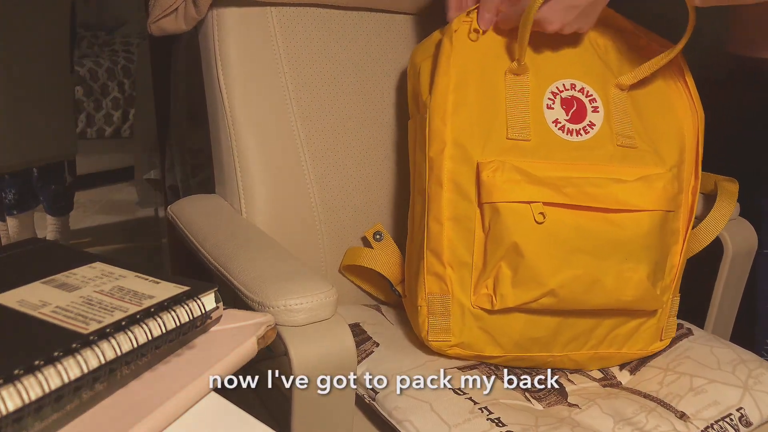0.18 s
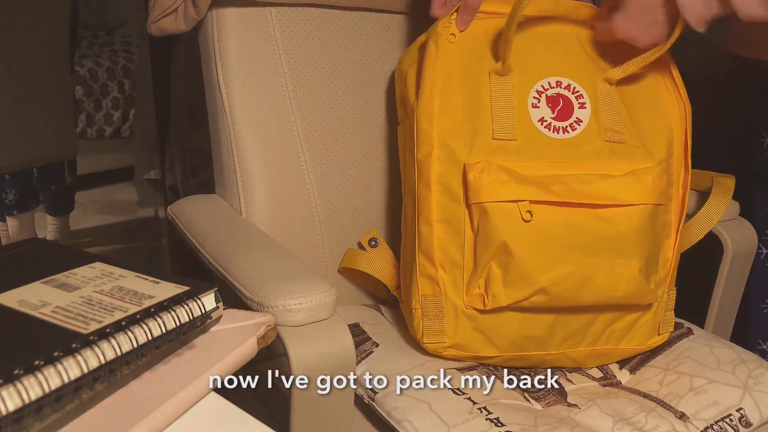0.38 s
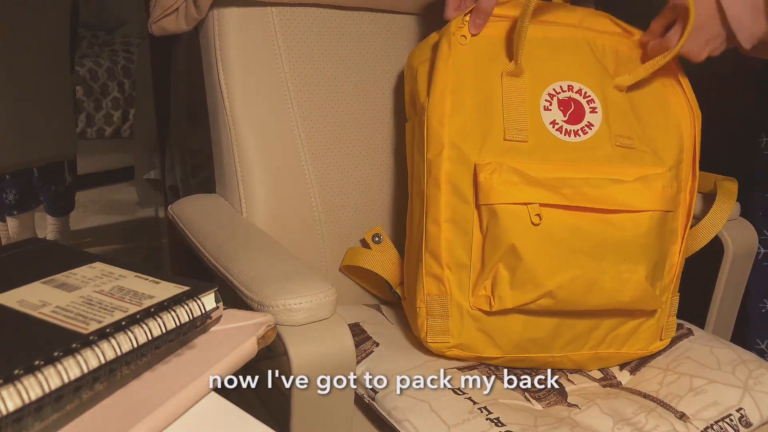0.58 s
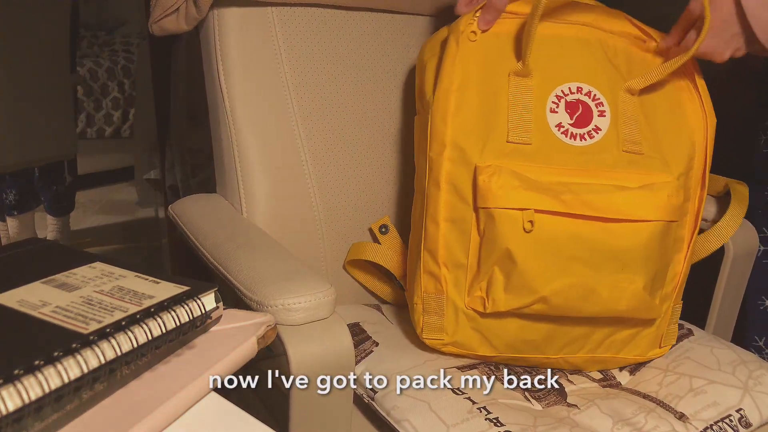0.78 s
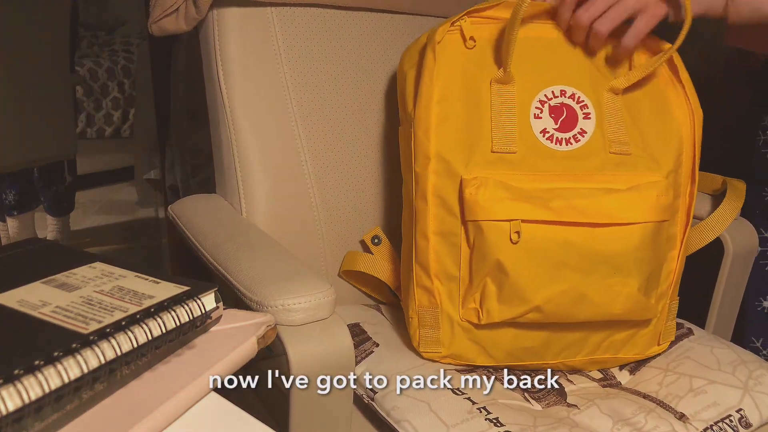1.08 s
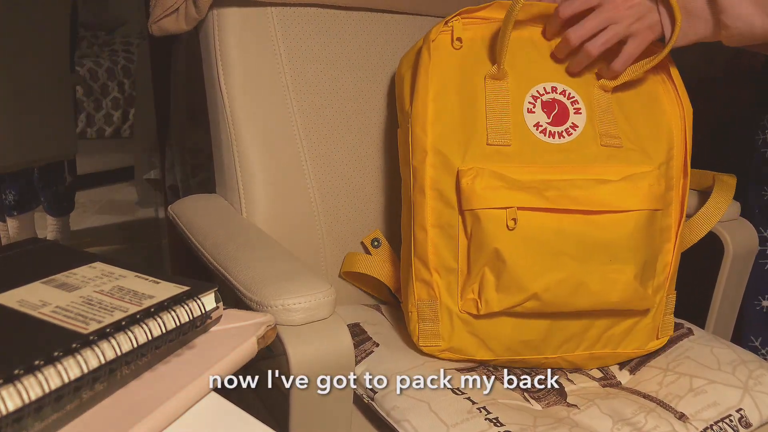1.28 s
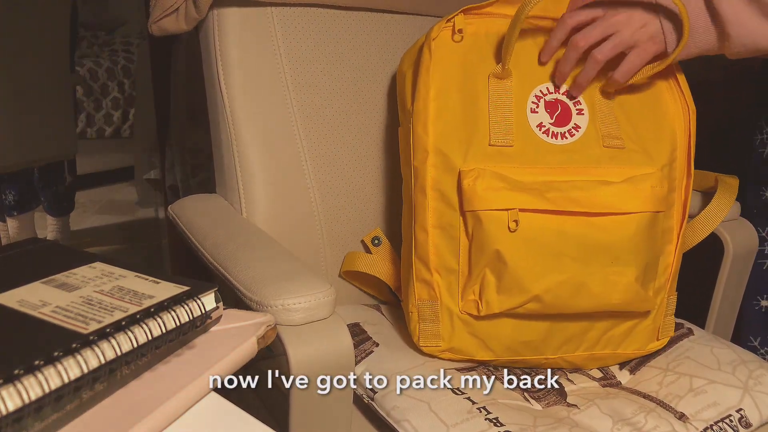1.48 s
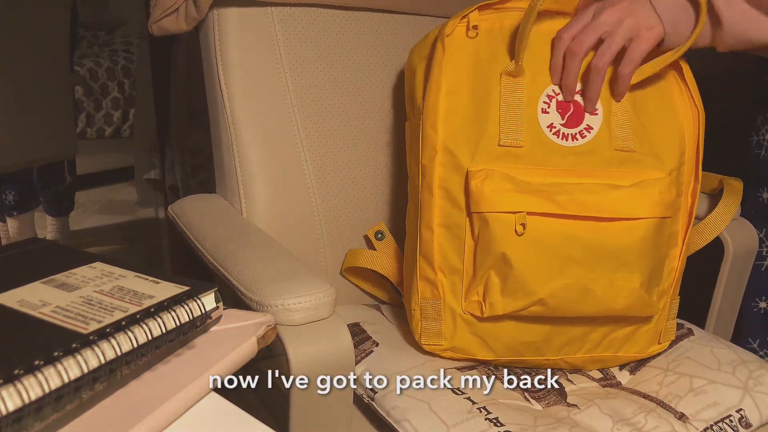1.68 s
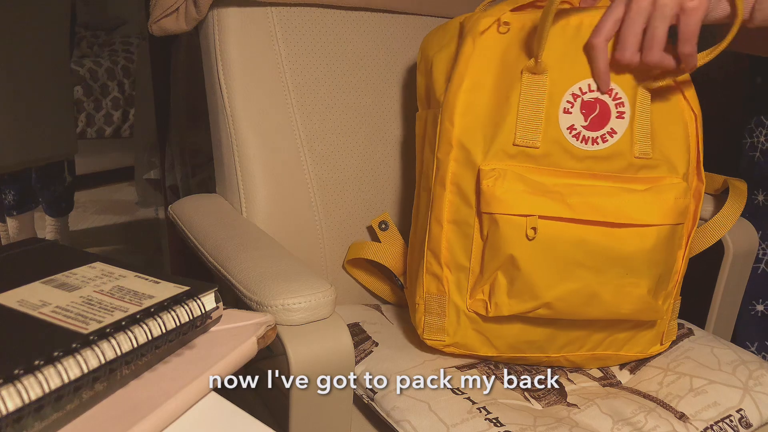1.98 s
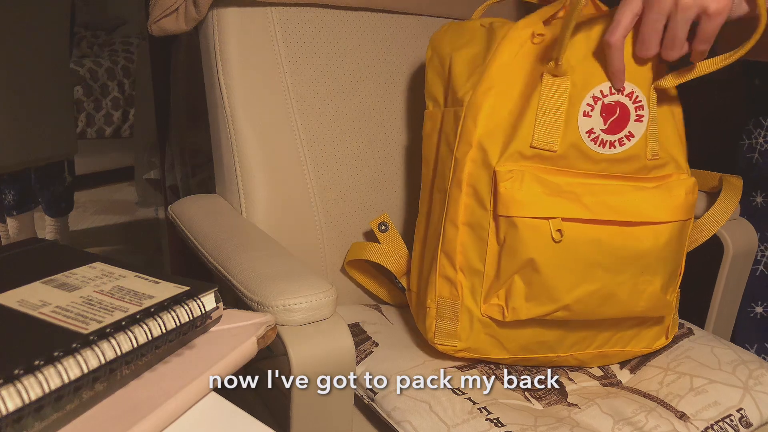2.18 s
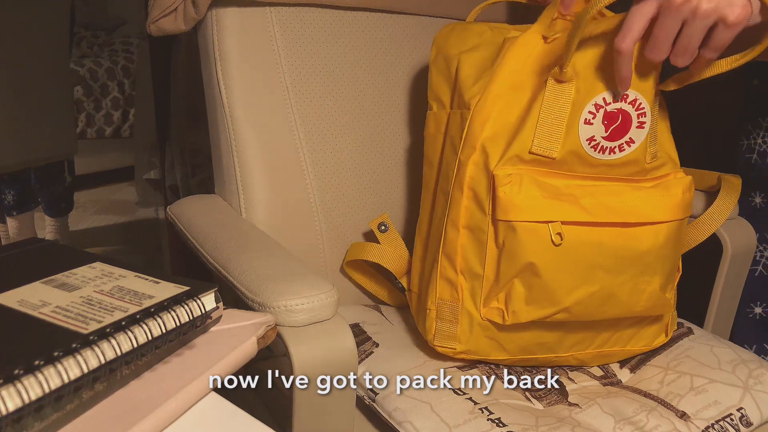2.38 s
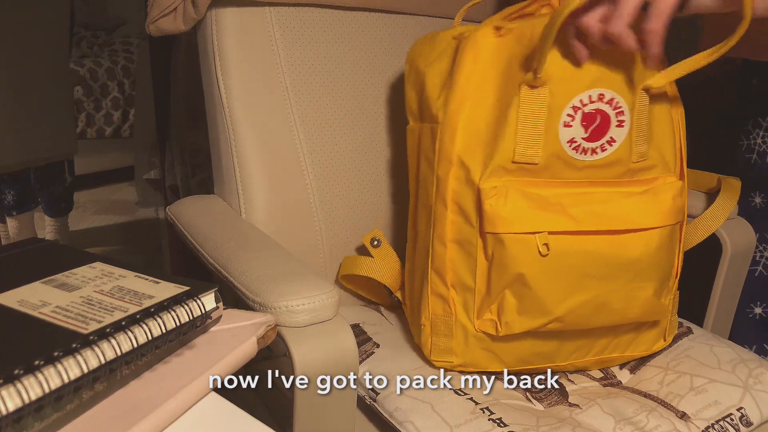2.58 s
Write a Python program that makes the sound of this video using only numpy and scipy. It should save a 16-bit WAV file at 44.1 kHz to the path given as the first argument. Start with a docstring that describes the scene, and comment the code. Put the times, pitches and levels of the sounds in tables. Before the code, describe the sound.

One short zip rasps up and down in pitch, followed by a hand rubbing and crumpling stiff canvas

```python
"""A small quiet room, with a canvas backpack on a padded chair, heard from close by.
One quick pull of the zipper, a row of tooth snaps, buzzes up and down in pitch.
Then a hand slides over the cloth and grips the top: filtered noise swishes, scuffs and scrapes.
Stiff folds buckle in small grains and pop as falling tones, fingernails and fittings tick as short
noise bursts, and the metal pull tabs clink as ringing tones shaken by a rattle."""
import sys
import numpy as np
from scipy import signal
from scipy.fft import rfft, irfft
from scipy.io import wavfile
from scipy.ndimage import uniform_filter1d

SR = 44100
rng = np.random.default_rng(int(sys.argv[2]) if len(sys.argv) > 2 else 0)


def store_pcm(level_fs):
    """Save levels as 16-bit WAV."""
    pcm = np.round(np.clip(level_fs, -1, 1) * 32767).astype(np.int16)
    wavfile.write(sys.argv[1], SR, np.atleast_2d(pcm).T)


N = 119070  # length of the scene [samples]
TIME = np.arange(N) / SR  # [s]


def amp(db):
    """Turns decibels into a plain gain."""
    return 10 ** (np.asarray(db) / 20)


def unit(x):
    """Scales a sound to an rms of 1."""
    return x / np.sqrt(np.mean(x ** 2) + 1e-20)


def read(points, hz):
    """Reads a frequency table between its points, on a log-frequency axis."""
    f, value = np.transpose(points)
    return np.interp(np.log(hz + 1), np.log(f), value)


def curve(table, axis=1):
    """Draws one column of a time table as a value for every sample."""
    rows = np.array(table)
    return np.interp(TIME, rows[:, 0], rows[:, axis])


def add(mix, s, sound):
    """Mixes a sound in, starting at s seconds."""
    start = max(round(s * SR), 0)
    part = mix[start:][:len(sound)]
    part += sound[:len(part)]


def colour(x, points, size=4096):
    """Filters with the given spectrum; the filter looks only backwards in time and has unit energy."""
    hz = abs(np.fft.fftfreq(size, 1 / SR))
    log_gain = np.log(amp(read(points, hz)))
    minimum_phase = np.exp(np.conj(signal.hilbert(log_gain)))
    ring = np.fft.ifft(minimum_phase).real[:size // 2]
    return signal.fftconvolve(x, ring / np.linalg.norm(ring))[:len(x)]


def wander(hz):
    """Makes a slow random curve of rms 1 that holds little above hz."""
    noise = rfft(rng.standard_normal(N))
    smoothing = 1 + (np.fft.rfftfreq(N, 1 / SR) / hz) ** 4
    return unit(irfft(noise / smoothing, N))


def steady(x, size=1800):
    """Evens out the slow level and keeps the fine grain; size is in samples."""
    power = uniform_filter1d(uniform_filter1d(x ** 2, size), size)
    return x / np.sqrt(abs(power) + 1e-9)


def grains(per_s, spread_db, smooth):
    """Random tiny slips of uneven size, over a share of smooth noise."""
    sizes = amp(spread_db * np.minimum(rng.exponential(1, N), 4))
    signs = rng.choice([-1, 1], N)
    happens = rng.random(N) < per_s / SR
    return unit(sizes * signs * happens) + smooth * rng.standard_normal(N)


def bend(x, delay_s):
    """Waves in a cloth panel: the treble outruns the bass (delay_s is the delay at 1 kHz)."""
    f = np.fft.rfftfreq(2 * N, 1 / SR)
    lag = np.exp(-4j * np.pi * delay_s * np.sqrt(1000 * f))
    return irfft(rfft(x, 2 * N) * lag)[:N]


def resonate(x, hz, width):
    """A resonance of gain 1 whose pitch may move; hz holds one value per sample."""
    turn = np.exp(2j * np.pi * np.cumsum(hz) / SR)
    r = np.exp(-np.pi * width / SR)
    # shift the pitch down to zero, smooth, and shift it back up
    return 2 * (turn * signal.lfilter([1 - r], [1, -r], x / turn)).real


def tick(db, hz, decay, size=2048):
    """A short hard contact: a broad noise burst around its own centre pitch."""
    width_octaves = 0.62
    t = np.arange(size) / SR
    f = np.fft.rfftfreq(size, 1 / SR)[1:]
    band = -10 * np.log10(1 + (np.log2(f / hz) / width_octaves) ** 4)
    burst = colour(rng.standard_normal(size) * np.exp(-t / decay), np.c_[f, band])
    return amp(db) * burst / abs(burst).max()


# Colour of the quiet background: (frequency [Hz], relative level [dB])
BACKGROUND_COLOUR = [(25, -66), (50, 15.5), (300, 7), (1500, 3), (4000, -12), (9000, -31), (16000, -7)]


def background():
    """A faint steady noise lies under everything."""
    level_db = -66.5
    return amp(level_db) * colour(rng.standard_normal(N), BACKGROUND_COLOUR)


# How long the room takes to fade by 60 dB: (frequency [Hz], time [s])
ROOM_FADE = [(100, 0.18), (300, 0.44), (1500, 0.15), (6000, 0.16)]


def room(x):
    """Scattered reflections make a short noisy tail, which fades at its own speed at each pitch."""
    gap_s = 0.0031  # the tail swells in over this time
    hz, t, z = signal.stft(rng.standard_normal(SR // 2), SR, nperseg=256)
    fade = amp(-60 * t / read(ROOM_FADE, hz)[:, None])
    tail = signal.istft(z * fade, SR, nperseg=256)[1]
    tail = tail * np.minimum(np.arange(len(tail)) / SR / gap_s, 1) ** 2
    return signal.fftconvolve(x, tail / np.linalg.norm(tail))[:N]


# Resonances of the hollow bag, rung by everything that touches it: (frequency [Hz], gain [dB])
HOLLOW_MODES = [(131, -6), (226, -6), (274, -18), (306, -17), (546, -12)]


def hollow(x):
    """The bag's cavity and panels hum on briefly after each touch."""
    width_hz = 12
    return sum(amp(db) * resonate(x, np.full(N, hz), width_hz) for hz, db in HOLLOW_MODES)


# Ticks of nails and fittings: (time [s], peak level [dB], centre frequency [Hz], decay [s])
TICK_EVENTS = [(0.164, -47.5, 2680, 0.00067), (0.198, -43.5, 1500, 0.0003), (0.2118, -38.5, 1820, 0.00028),
               (0.366, -31, 3030, 0.00089), (0.4925, -34, 2510, 0.00073), (0.6, -30, 1860, 0.00027),
               (0.8609, -30, 10300, 0.0034), (1.0056, -28, 2230, 0.0005), (1.0055, -29, 10000, 0.0026),
               (1.011, -22.5, 9900, 0.0016), (1.031, -44, 4400, .001), (1.099, -40, 2800, .001),
               (1.163, -43, 4000, 0.001), (1.436, -29, 8600, 0.0044), (1.842, -45, 900, 0.0023),
               (1.967, -32.5, 6000, 0.0042), (1.995, -33.5, 5940, 0.0012), (2.049, -23, 3050, 0.0004),
               (2.2285, -33, 1860, 0.00081), (2.285, -40, 2000, 0.0013), (2.358, -29.5, 4400, 0.00085)]


def ticks():
    """Nails and fittings knock on the bag, each with a short noise burst."""
    out = np.zeros(N)
    for s, db, hz, decay in TICK_EVENTS:
        add(out, s, tick(db, hz, decay))
    return out


# Pull tabs clinking: (time [s], peak level [dB])
CLINK_EVENTS = [(0.96, -35), (1.435, -49), (1.704, -51), (1.93, -40), (1.9695, -41), (1.998, -43),
                (2.016, -35.5), (2.0512, -36), (2.357, -40), (2.385, -37), (2.646, -43.5)]
# Ring of a metal tab: (frequency [Hz], typical relative level [dB], time to fade by 60 dB [s])
TAB_MODES = [(5694, -2.5, 0.11), (7710, -9, 0.11), (8610, -11.5, 0.075), (12940, 3.5, 0.059)]


def clinks():
    """A metal tab chatters against its slider, which keeps its ring grainy."""
    spread_db, detune_share = 5.5, 0.0022  # how much the ring varies from clink to clink
    rattle_s, rattle_share = 0.0092, 0.38  # decay of the chatter, share of bare contact noise
    out = np.zeros(N)
    t = np.arange(SR // 4) / SR
    hz, mode_db, t60 = np.array(TAB_MODES).T[:, :, None]
    for s, db in CLINK_EVENTS:
        strength, detune = rng.standard_normal((2, len(TAB_MODES), 1))
        mode_level = amp(mode_db + spread_db * strength - 60 * t / t60)
        modes = mode_level * np.sin(2 * np.pi * hz * (1 + detune_share * detune) * t)
        # cubed noise has rare strong peaks, like single contacts
        contacts = rng.standard_normal(len(t)) ** 3 * np.exp(-t / rattle_s)
        rattle = np.diff(contacts, prepend=0)
        ring = unit(signal.fftconvolve(rattle, modes.sum(0))[:len(t)])
        clink = ring + rattle_share * unit(rattle)
        add(out, s, amp(db) * clink / abs(clink).max())
    return out


# The bag flexing: (time [s], level [dB]); crackle() follows it too
FLEX_LEVEL = [(0, -93), (0.16, -63.5), (0.45, -48), (0.68, -59), (1.0, -53.5), (1.08, -57), (1.21, -51.5),
              (1.3, -64.5), (1.46, -52), (1.54, -64.5), (1.66, -60.5), (1.71, -58), (1.92, -56.5),
              (2.02, -40.5), (2.11, -44), (2.22, -37), (2.33, -50), (2.4, -46), (2.5, -63.5), (2.7, -61.5)]
# Colour of the creasing cloth: (frequency [Hz], relative level [dB])
CRUMPLE_COLOUR = [(25, -74), (48, -10.5), (105, -3.5), (140, -2), (310, 3.5), (420, -12), (550, -3.5),
                  (1100, -17), (12000, -55)]


def flexing():
    """Many small creases give way and thud in the hollow bag."""
    creases = colour(grains(230, 2.07, 0.17), CRUMPLE_COLOUR)
    return steady(bend(creases, 0.000672), size=1400) * amp(curve(FLEX_LEVEL))


def crackle(count=340):
    """Stiff canvas gives way in small dry snaps, louder the harder the bag is flexed."""
    hardest_db, follow = -38.5, 1  # typical peak at the hardest flexing, and dB per dB of flexing
    spread_db, typical_hz, decay_s = 2.5, 2280, 0.00041
    out, flex = np.zeros(N), curve(FLEX_LEVEL)
    # one snap at a random moment in each equal slice of time
    places = (np.arange(count) + rng.random(count)) * N / count
    for at in places.astype(int):
        strength, pitch = rng.standard_normal(2)
        db = hardest_db + follow * (flex[at] - flex.max()) + spread_db * strength
        add(out, at / SR, tick(db, typical_hz * 2 ** (pitch / 2), decay_s))
    return out


# Hand sliding on canvas: (time [s], swish level [dB], scuff level before a 2.5 dB cut [dB]),
# both before the stutter
RUB_LEVELS = [(0, -64.5, -67), (0.08, -70.5, -78), (0.58, -69, -63.5), (0.81, -61.5, -55),
              (0.94, -47.5, -52), (1.08, -56.5, -59), (1.125, -59, -49.5), (1.21, -57, -51),
              (1.29, -56, -57), (1.43, -54.5, -45), (1.505, -59, -75), (1.545, -72.5, -68),
              (1.63, -66.5, -64), (1.665, -58, -53), (1.85, -62.5, -91), (1.875, -52.5, -55),
              (1.91, -55.5, -64.5), (2.21, -56, -43), (2.335, -62.5, -76), (2.363, -43.5, -38),
              (2.41, -60.5, -55), (2.5, -64.5, -64), (2.555, -59, -54.5), (2.615, -65.5, -62),
              (2.67, -55, -61)]
# Bright colour of the cloth: (frequency [Hz], relative level [dB])
SWISH_COLOUR = [(300, 2.5), (4300, 5), (6500, 0), (15500, -6.5)]
# Dull colour of the cloth, also used by pops(): (frequency [Hz], relative level [dB])
SCUFF_COLOUR = [(40, -13.5), (180, -6.5), (280, 6.5), (420, -1), (1100, -2.5), (1700, -5), (2600, -17),
                (8000, -40)]


def rubbing():
    """Skin catches on the weave: a bright swish and a duller scuff that stutter together."""
    stutter_db = 2 * wander(62)
    swish = steady(colour(grains(1600, 3.74, 1.0), SWISH_COLOUR))
    scuff = steady(colour(grains(1200, 3.4, 1.0), SCUFF_COLOUR))
    swish = swish * amp(curve(RUB_LEVELS) + stutter_db)
    scuff = scuff * amp(curve(RUB_LEVELS, axis=2) + stutter_db - 2.5)
    return swish + scuff


# Fingertips dragging over the taut panel: (time [s], resonance [Hz], level [dB])
SCRAPE_PATH = [(1.07, 650, -87), (1.12, 710, -59), (1.36, 870, -52), (1.405, 1030, -59), (1.43, 1400, -48),
               (1.46, 704, -48), (1.51, 730, -50.5), (1.54, 710, -80)]


def scraping():
    """A hollow scrape: noise through a resonance whose pitch follows the fingers across the panel."""
    width_hz = 320  # of each of the two passes
    hz = curve(SCRAPE_PATH)
    once = resonate(rng.standard_normal(N), hz, width_hz)
    ring = resonate(once, hz, width_hz)
    touching = (TIME > SCRAPE_PATH[0][0]) * (TIME < SCRAPE_PATH[-1][0])
    return steady(ring) * amp(curve(SCRAPE_PATH, axis=2)) * touching


# Folds popping through: (time [s], level before a 5.5 dB cut [dB], final pitch [Hz], decay [s])
POP_EVENTS = [(0.6, -33.5, 249.2, 0.011), (0.816, -46, 293, 0.0075), (0.8872, -34.5, 607, 0.011),
              (0.951, -25.5, 225, 0.0088), (0.994, -32.5, 242.3, 0.022), (1.1, -37, 448, 0.01),
              (1.198, -33.5, 503, 0.0088), (1.214, -35, 482, 0.0043), (1.583, -45, 418, 0.0034),
              (1.686, -42.5, 283, 0.034), (1.87, -37.5, 234, 0.015), (1.925, -28.5, 199, 0.011),
              (1.962, -28.5, 290, 0.013), (1.986, -30.5, 333, 0.0045), (2.011, -31.5, 272, 0.023),
              (2.06, -27, 303, 0.004), (2.125, -36.5, 559.5, 0.054), (2.226, -30.5, 272, 0.02),
              (2.286, -33.5, 503, 0.02), (2.304, -32, 308, 0.0074), (2.553, -38.5, 614, 0.0078),
              (2.65, -43.5, 487, 0.0093)]


def pops():
    """A fold snaps through: the pitch drops at once as the panel goes slack."""
    sweep_hz, sweep_s = 981, 0.00262  # height and decay time of the pitch drop
    rise_s, grit_share = 0.0013, 0.38
    out = np.zeros(N)
    t = np.arange(SR // 10) / SR
    for s, db, hz, decay in POP_EVENTS:
        turns = np.cumsum(hz + sweep_hz * np.exp(-t / sweep_s)) / SR
        grit = unit(colour(rng.standard_normal(len(t)), SCUFF_COLOUR))
        shape = (1 - np.exp(-t / rise_s)) * np.exp(-t / decay)
        snap = np.sin(2 * np.pi * turns) + grit_share * grit
        add(out, s, amp(db - 5.5) * shape / shape.max() * snap)
    return out


# The zipper pull: (time [s], speed [teeth per s], rasp level [dB], drumming level [dB]);
# the rasp level also steers the hiss
ZIP_PULL = [(0.2, 115, -66, -49.5), (0.22, 161, -53, -44.5), (0.258, 312, -42, -39), (0.284, 447, -37, -55),
            (0.301, 460, -38.5, -40.5), (0.322, 507, -34.5, -44.5), (0.369, 577, -37, -71),
            (0.391, 476, -38, -60), (0.411, 505, -37.5, -40), (0.432, 365, -38, -35.5),
            (0.45, 275, -43, -33), (0.478, 206, -48.5, -41.5), (0.503, 133, -54, -39),
            (0.535, 118, -59, -48)]
# Unevenness of the teeth: (time [s], timing scatter [share of one tooth])
TOOTH_SCATTER = [(0.25, .14), (0.28, .03), (0.3, .02), (0.313, .09), (0.326, .025), (0.36, .016),
                 (0.374, .12), (0.392, .035), (0.44, .07)]
# Colours of the rasp, the drumming and the hiss, each: (frequency [Hz], relative level [dB])
RASP_COLOUR = [(100, -24), (300, -11), (510, 3), (750, -2), (1050, 4.5), (1550, 5), (2100, 0), (2800, -7),
               (3700, -7.5), (7000, -24)]
DRUM_COLOUR = [(40, -18), (150, -17), (210, -4), (285, 4), (390, -8), (540, -5), (780, -14.5), (1500, -36),
               (5000, -68)]
HISS_COLOUR = [(1200, -18), (4500, 1.5), (8000, 0.5), (15500, -5.5)]


def zipper(size_db=1.5, grit=0.068, hiss_floor=0.49, tooth_share=.4, fade_s=0.0036, delay_s=0.001547):
    """The slider snaps over each tooth: a rasp, a drumming of the bag and a puff of hiss."""
    hiss_db, hiss_growth_db = -13, 4.5  # top-speed level against the rasp, gain per doubling of speed
    echo_gain, echo_start_s, echo_s_per_tooth = 0.73, 0.00119, 0.00003
    rate = curve(ZIP_PULL)
    turns = np.cumsum(rate) / SR  # teeth passed so far
    at = np.flatnonzero(np.diff(np.floor(turns)))

    # one click per tooth, a little early or late and of uneven size
    slip, strength = rng.standard_normal((N, 2))[:len(at)].T
    scatter = slip * curve(TOOTH_SCATTER)[at] * SR / rate[at]
    place = np.clip(at + scatter, 0, N - 1).astype(int)
    teeth = np.zeros(N)
    teeth[place] = amp(size_db * strength) * np.sqrt(SR / rate[at])

    # noise that swells at each tooth
    puff_shape = unit(hiss_floor + np.exp(-(turns % 1) / tooth_share))
    puffs = puff_shape * rng.standard_normal(N)

    force = amp(curve(ZIP_PULL, axis=2))
    wave = bend(colour(teeth + grit * puffs, RASP_COLOUR), delay_s)
    # the seam's echo lags more as the slider moves away
    echo_time = TIME - echo_start_s - echo_s_per_tooth * turns
    wave = wave + echo_gain * np.interp(echo_time, TIME, wave)
    rasp = steady(wave, size=600) * force

    drum = steady(colour(teeth + 0.31 * puffs, DRUM_COLOUR), size=600)
    drum = drum * amp(curve(ZIP_PULL, axis=3))

    hiss_level = amp(hiss_db + hiss_growth_db * np.log2(rate / rate.max()))
    hiss = colour(puffs + 0.22 * teeth, HISS_COLOUR) * force * hiss_level

    # seconds before the start or after the end of the pull
    outside = np.maximum(np.maximum(ZIP_PULL[0][0] - TIME, TIME - ZIP_PULL[-1][0]), 0)
    return (rasp + drum + hiss) * np.exp(-outside / fade_s)


def scene():
    """The bag, its room and the quiet background."""
    room_db = -10.5
    bag = zipper() + rubbing() + scraping() + flexing() + pops() + crackle() + ticks() + clinks()
    bag = bag + hollow(bag)
    return (bag + amp(room_db) * room(bag) + background())[None]


def record(dry, low_cut_hz=38, high_cut_hz=15900):
    """Takes away the lowest rumble and the very highest treble."""
    low_cut = signal.butter(4, low_cut_hz, "highpass", fs=SR, output="sos")
    thin = signal.sosfilt(low_cut, dry)
    band_limit = signal.firwin(401, high_cut_hz, window=("kaiser", 8), fs=SR)
    return signal.oaconvolve(thin, band_limit[None], "same")


dry = scene()
out = record(dry)
store_pcm(out)
```